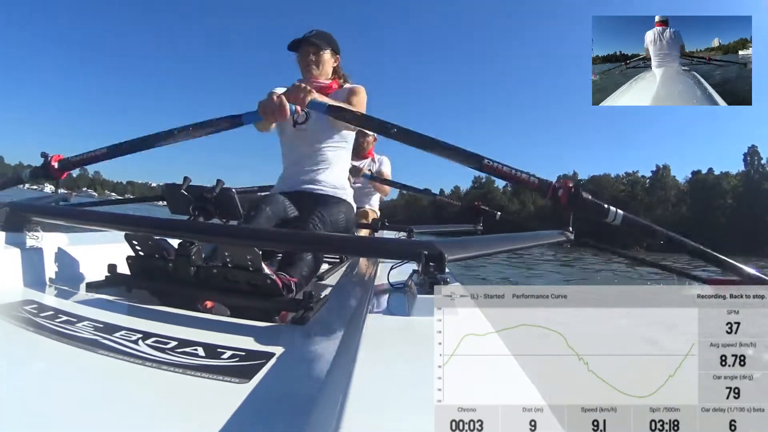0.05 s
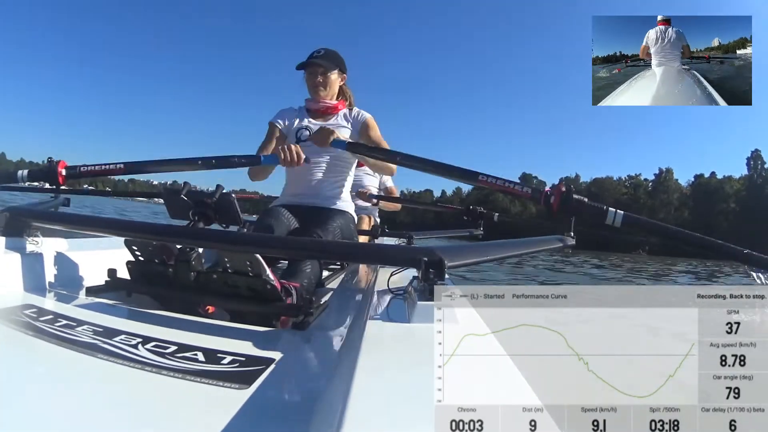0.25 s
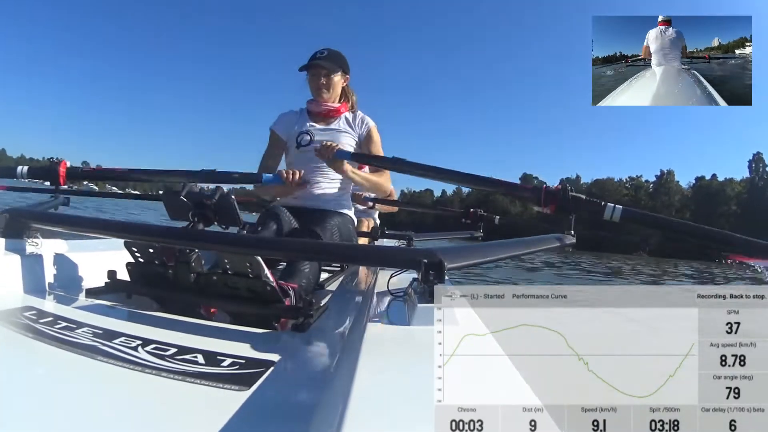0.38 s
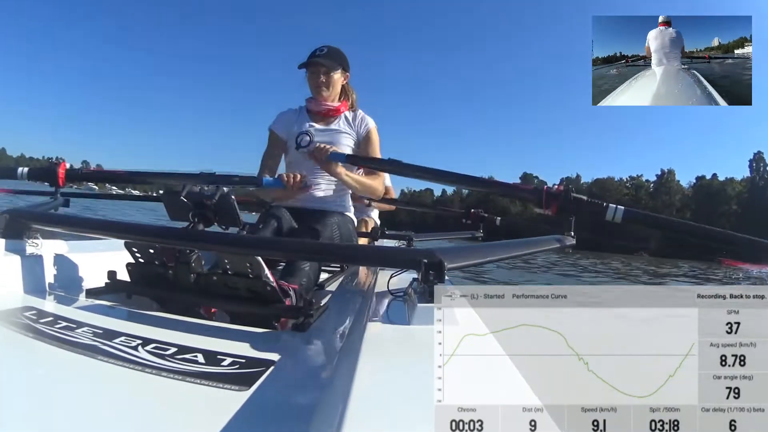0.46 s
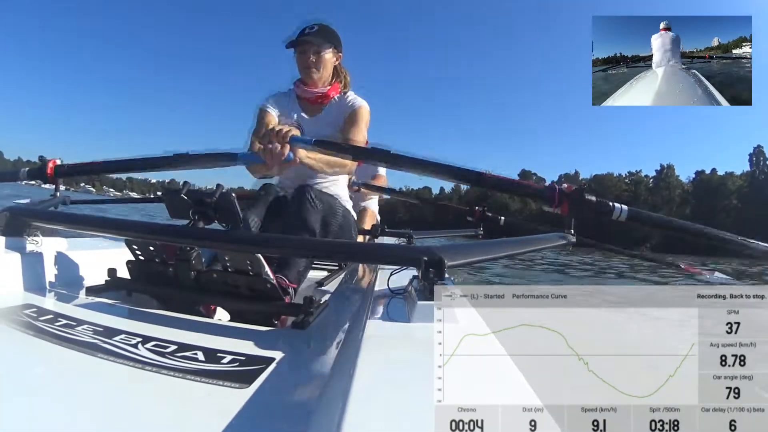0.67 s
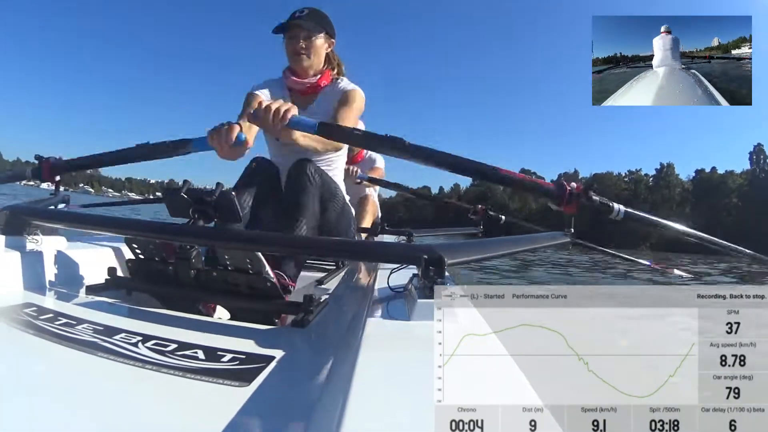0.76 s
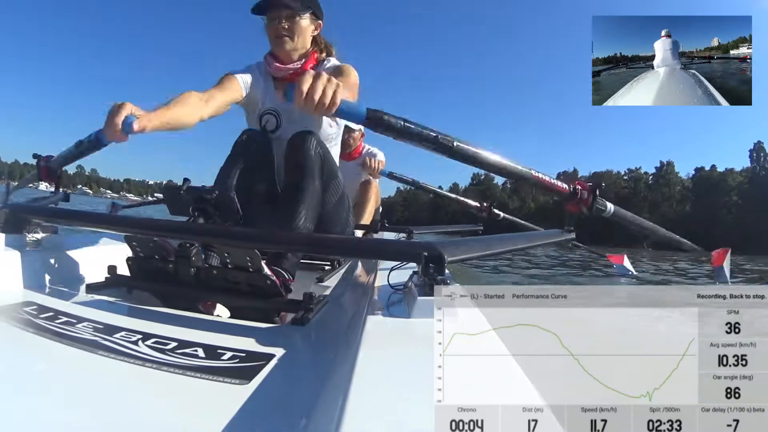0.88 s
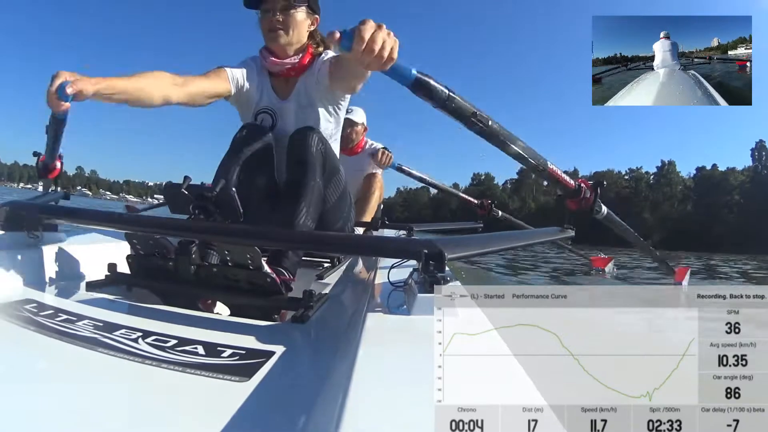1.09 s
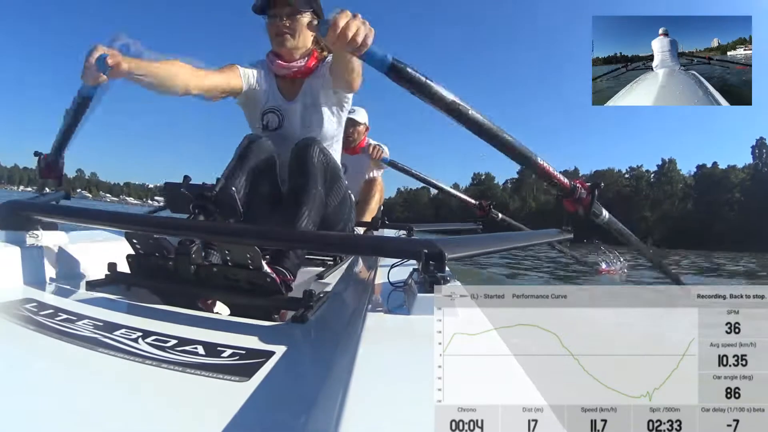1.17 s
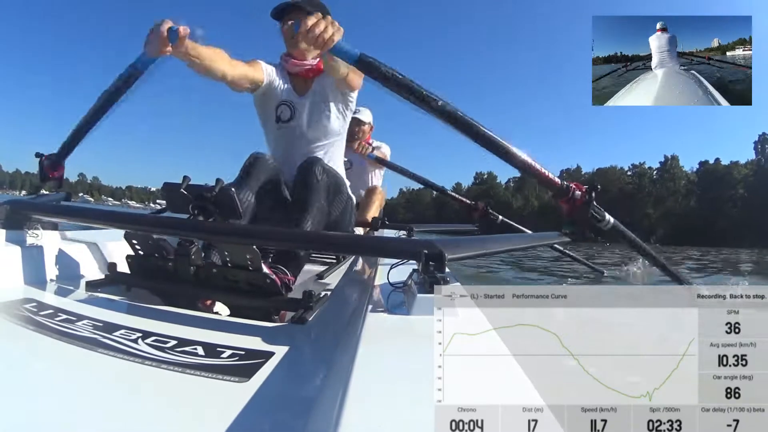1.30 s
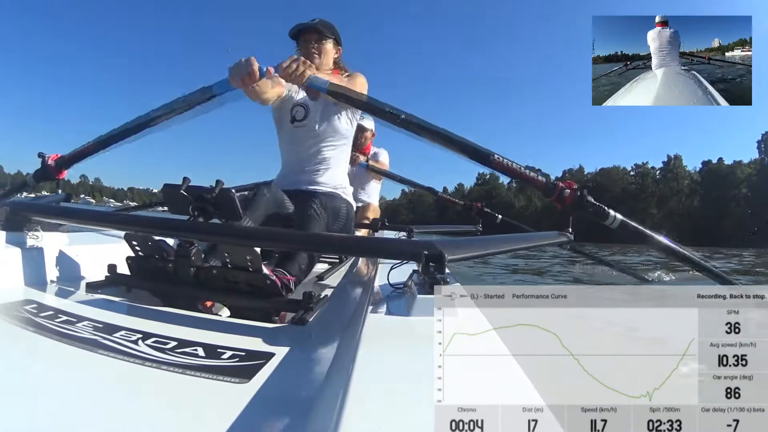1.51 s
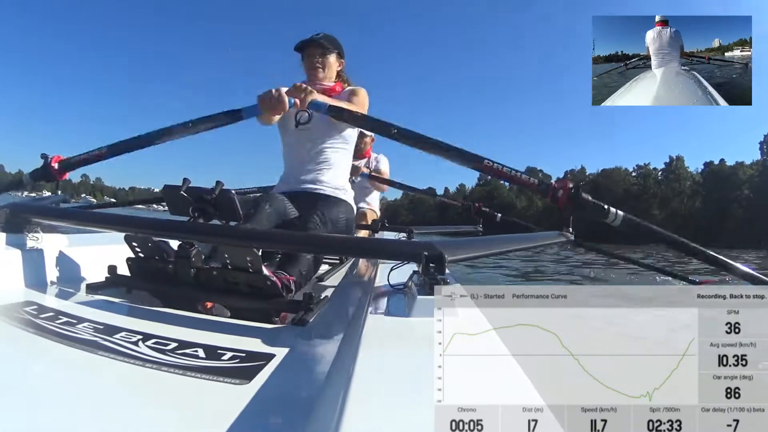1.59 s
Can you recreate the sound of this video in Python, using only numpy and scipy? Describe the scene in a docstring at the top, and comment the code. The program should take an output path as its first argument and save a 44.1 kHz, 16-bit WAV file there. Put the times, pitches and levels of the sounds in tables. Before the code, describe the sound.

Oars clunk in their locks as seats rumble and water washes past a rowing boat.

```python
"""One stroke of a double scull on open water, heard from the deck.
Throughout, water washes, spatters and bubbles alongside. From 0.2 s the oars clunk in their locks
and leave the water; sliding seats roll and boom the hollow hull; air buffets the microphone.
Near 0.5 s and 1 s fittings tick and the sleeves squeak as the oars turn.
At 1.2 s the oars clunk again, squared and dropped in; the rumble dies away."""
import sys
import numpy as np
from scipy import signal
from scipy.fft import rfft, irfft
from scipy.io import wavfile
from scipy.ndimage import uniform_filter1d, minimum_filter1d

SR = 44100
rng = np.random.default_rng(int(sys.argv[2]) if len(sys.argv) > 2 else 0)


def transcribe(signal):
    """Save signal, clipped to [-1, 1], as a 16-bit WAV file at the path in sys.argv[1]."""
    frames = np.atleast_2d(signal).T
    limited = np.clip(frames, -1, 1)
    pcm = np.round(limited * 32767).astype(np.int16)
    wavfile.write(sys.argv[1], SR, pcm)


N = 72765
T = np.arange(N) / SR

# Envelopes of hull wash, blade spray, rolling seats, air gusts: t/s, level/dB
WASH_ENV = [(0, -40.5), (.13, -36.5), (.18, -41.5), (.235, -32), (.27, -29.5), (.35, -37.5), (.46, -28.5),
            (.54, -23.5), (.6, -34), (.69, -44.5), (.76, -34), (.81, -31), (.87, -31.5), (.96, -28.5),
            (1.03, -29), (1.11, -42.5), (1.19, -32), (1.26, -28), (1.3, -40), (1.36, -42.5), (1.42, -35),
            (1.55, -42), (1.65, -36.5)]
SPRAY_ENV = [(0, -63), (.15, -56), (.28, -49), (.34, -57), (.44, -49), (.57, -51.5), (.63, -50),
             (.72, -51.5), (.85, -54.5), (1, -50), (1.05, -58.5), (1.28, -57), (1.47, -59.5), (1.65, -54.5)]
SEAT_ENV = [(0, -38.5), (.1, -31), (.195, -36), (.23, -12.5), (.3, -22), (.36, -16), (.405, -22),
            (.45, -13.5), (.6, -12), (.66, -22), (.72, -28.5), (.85, -28), (.94, -22.5), (.98, -13),
            (1.05, -10.5), (1.15, -26.5), (1.21, -27.5), (1.31, -31.5), (1.38, -27), (1.5, -35),
            (1.65, -34)]
GUST_ENV = [(0, -69.5), (.19, -63), (.26, -33), (.38, -52.5), (.44, -37), (.5, -63), (.555, -22),
            (.7, -26.5), (.86, -31), (1.0, -36.5), (1.2, -28), (1.3, -42), (1.65, -54)]
# Noise spectra of wash, spray, hull boom, wheel growl, air: f/Hz, level/dB
WASH_SPECTRUM = [(150, -15.5), (400, -1), (560, -2.5), (690, 10), (790, -4), (1000, 2), (1220, 5.5),
                 (1600, -4.5), (2300, -9.5), (3000, -30), (5000, -33), (9000, -44)]
SPRAY_SPECTRUM = [(400, -55.5), (1500, -4.5), (2800, 15.5), (3600, 11.5), (4700, 15), (5800, 3),
                  (7000, -12), (9000, -15), (11000, -15)]
BOOM_SPECTRUM = [(30, -74), (90, -26), (130, -6), (155, -1), (180, 2), (215, -9.5), (270, -17.5),
                 (340, -60.5), (3000, -120)]
GROWL_SPECTRUM = [(25, -28.5), (75, -12.5), (105, -18.5), (140, -23), (200, 3.5), (270, 1), (345, -15),
                  (400, -8), (470, -16.5), (600, -16), (900, -51), (6000, -100)]
AIR_SPECTRUM = [(15, -54.5), (35, -7), (60, 9), (100, 13.5), (200, 7.5), (600, -58), (4000, -92)]
# Burst spectra of sharp impacts, rigger shiver, sleeve clatter: f/Hz, level/dB
IMPACT_SPECTRUM = [(500, -22), (1500, -5), (3600, -1), (4700, 4), (6000, -3), (7500, -20), (11000, -25)]
SHIVER_SPECTRUM = [(2000, -49), (4400, -12.5), (5100, 5.5), (6500, -35.5)]
CLATTER_SPECTRUM = [(100, -16.5), (400, 1), (800, 13.5), (1200, 19.5), (2200, 7), (3000, -6), (4700, -11),
                    (6500, -47), (11000, -52)]
# Left-right correlation of wash, spray, wheel growl: f/Hz, correlation
WASH_CORR = [(200, 0.91), (400, 0.33), (650, 1), (850, 0.34), (1200, 0.91), (2000, 0.39), (6000, 0.2)]
SPRAY_CORR = [(1000, 0.069), (5000, 0.61), (8000, 0.14)]
GROWL_CORR = [(30, 1), (180, 0.93), (270, 1), (380, 0.33), (2000, 0.47)]
# Modes of collar, lock with rigger, hollow hull: f/Hz, level/dB, t60/s
COLLAR_MODES = [(2310, 17, 0.0053), (3790, -9, 0.035), (4510, 6.5, 0.0079)]
LOCK_MODES = [(498.5, 4, 0.062), (674, -3.5, 0.19), (960, 5, 0.012), (1280, -0.5, 0.02), (1393, -16, 0.15),
              (1730, 6.5, 0.017), (2234, 1, 0.029), (4260, -17.5, 0.021)]
HULL_MODES = [(157.25, -15, 0.67), (154, -0.5, 0.063), (214, -8, 0.049), (294, -2.5, 0.041),
              (280, 1, 0.025)]
# Bubbles beside the hull, drips off the blades: t/s, f/Hz, level/dB
BUBBLES = [(.05, 710, -27.5), (0.261, 1220, -22), (.8, 1120, -26.5), (1.054, 1036, -18), (1.32, 1100, -26),
           (1.399, 1052, -26.5), (1.41, 551, -30), (1.61, 594, -31.5)]
DRIPS = [(0.0626, 4600, -45), (0.0954, 3380, -42), (.174, 4800, -40), (0.2474, 4560, -38),
         (.392, 4610, -41), (1.1742, 4050, -40), (1.533, 4370, -38), (1.608, 5900, -46.5)]
# Collar slams: t/s, clack/dB, f/Hz, pan/dB, metal/dB, thud/dB
SLAMS = [(0.1971, -17.5, 2055, 5.5, -32, -34), (0.32, -23.5, 1230, -3.5, -48, -21),
         (0.4823, -11, 1400, 2, -41.5, -29), (0.486, -19, 1250, -2, -28, -27.5),
         (0.522, -2.5, 1192, -3.5, -27.5, -14), (0.663, -22, 1170, -2, -50.5, -32.5),
         (0.986, -19, 1600, 3, -45.5, -28.5), (1.2284, -2.5, 1100, 3, -21.5, -2),
         (1.2317, -6, 1000, 11, -19.5, -22.5)]
# Oar knocks in the locks: t/s, level/dB, treble/dB, thump/dB, scrape decay/s, pan/dB
KNOCKS = [(0.1975, -17.5, -6.5, -34, 0.011, -1), (.213, -18, -10, -15.5, 0.0096, 1),
          (.320, -20, -4.5, -12.5, 0.0041, 4.5), (0.413, -17, -17, -20.5, 0.01, 0),
          (.446, -23, 5.5, -16, 0.032, -2), (.4835, -13.5, 0, -14, 0.011, -3),
          (.5165, -6, -2.5, -7, 0.0063, 3), (.637, -25, 1, -13, 0.025, -1.5),
          (.894, -20, -0.5, -15.5, 0.0044, 2.5), (.9845, -13, -13, -18, 0.004, -1.5),
          (1.055, -26, -1.5, -29.5, 0.024, -1), (1.2305, -5.5, -9.5, -11, 0.0071, 4.5),
          (1.318, -31, 2, -31, 0.027, 0.5)]
# Hull booms, sleeve squeaks: t/s, length/s, start f/Hz, end f/Hz, level/dB
BOOMS = [(.215, 0.038, 200, 160, -10), (.322, .072, 176.1, 166, -6.5), (.428, 0.056, 180, 211.8, -4.5),
         (.485, 0.044, 175, 175.7, -13.5), (.555, 0.055, 165, 158, -6.5), (.643, 0.033, 205, 166.7, -11.5),
         (0.764, 0.016, 235, 191.5, -12.5), (.998, 0.072, 188.8, 179.3, -5),
         (1.082, 0.074, 185, 156.8, -14.5)]
SQUEAKS = [(0.507, 0.037, 1847, 1978, -22.5), (0.541, 0.039, 2180, 2260, -33.5),
           (0.979, 0.033, 1650, 1610, -24.5), (1.005, 0.025, 1713, 1924, -30)]
# Ticks of the fittings: t/s, level/dB, pan/dB
TICKS = [(.442, -28.5, -8), (0.452, -22.5, -7), (0.492, -25, -4), (0.4966, -29.5, 1), (0.51, -30, -6.5),
         (0.599, -39.5, 12), (1.008, -34, 8)]
# Phase between the microphone ports: f/Hz, left lead/rad
PORT_PHASE = [(50, 0), (100, .3), (180, .65), (280, .6), (370, 1.2), (470, .4), (640, -1.5), (850, -2.2),
              (1050, -.35), (1600, -.1), (5000, 0)]
# Balance of the ports: f/Hz, left over right/dB
PORT_BALANCE = [(380, -.5), (480, 1.5), (850, 2), (1200, -1), (1700, -.5), (2300, 3), (3200, -1),
                (5000, -1.5), (9000, 1.5)]


def amp(db):
    """dB to gain."""
    return 10 ** (np.asarray(db) / 20)


def unit(x):
    """Scale to rms 1."""
    return x / np.sqrt(np.mean(x ** 2) + 1e-20)


def at_hz(points, hz):
    """Interpolate over log frequency."""
    f, value = np.transpose(points)
    return np.interp(np.log(hz + 1), np.log(f), value)


def envelope(points):
    """Gain over time from dB breakpoints."""
    return amp(np.interp(T, *np.transpose(points)))


def pan(db):
    """Stereo gains, left over right by db."""
    return amp([[db / 2], [-db / 2]])


def add(mix, t_s, sound):
    """Mix a sound in at t_s."""
    part = mix[:, round(t_s * SR):][:, :sound.shape[-1]]
    part += sound[..., :part.shape[1]]


def noise(spectrum, corr, size=N):
    """Stereo noise, rms 1, of given spectrum and left-right correlation."""
    hz = np.fft.rfftfreq(size, 1 / SR)
    a, b = rfft(rng.standard_normal((2, size)))
    c = np.clip(at_hz(corr, hz) if np.ndim(corr) else corr, -1, 1)
    mid, side = a * np.sqrt(1 + c), b * np.sqrt(1 - c)
    return unit(irfft(np.array([mid + side, mid - side]) * amp(at_hz(spectrum, hz)), size))


def decay(t, tau_s):
    """Exponential fall from 1."""
    return np.exp(-t / tau_s)


def attack(t, tau_s):
    """Exponential rise to 1."""
    return 1 - decay(t, tau_s)


def ring(modes, t, detune):
    """Decaying modes, randomly detuned per blow."""
    return sum(amp(db - 60 * t / t60_s) * np.sin(2 * np.pi * hz * (1 + detune * rng.uniform(-1, 1)) * t)
               for hz, db, t60_s in modes)


def ping(t, hz, rise_s):
    """A few cycles that swell for rise_s, then die."""
    return t / rise_s * np.exp(1 - t / rise_s) * np.sin(2 * np.pi * hz * t)


def wobble(size, smooth_samples):
    """Smooth random motion, rms about 1."""
    rough = uniform_filter1d(rng.standard_normal(16384), smooth_samples)
    return unit(uniform_filter1d(rough, smooth_samples // 2))[:size]


def wash(flutter_db=2.18):
    """Water washes along the hull, level fluttering."""
    flutter = amp(flutter_db * unit(uniform_filter1d(rng.standard_normal(N), size=450)))
    return unit(noise(WASH_SPECTRUM, WASH_CORR) * flutter) * envelope(WASH_ENV)


def spray(drops_per_s=700, spread_db=3.2, drops_db=-5, shapes=10):
    """Spray off the blades: hiss plus separate drop impacts."""
    drops, t = np.zeros((2, N)), np.arange(256) / SR
    for _ in range(shapes):
        hits = rng.random(N) < drops_per_s / shapes / SR
        gains = amp(spread_db * np.minimum(rng.exponential(1, N), 4))
        splat = noise(SPRAY_SPECTRUM, SPRAY_CORR, len(t)) * attack(t, 0.0004) * decay(t, 0.00071)
        drops += signal.oaconvolve((hits * gains)[None], splat)[:, :N]
    hiss = noise(SPRAY_SPECTRUM, SPRAY_CORR)
    return unit(hiss + amp(drops_db) * unit(drops)) * envelope(SPRAY_ENV) * pan(db=-2.5)


def seats(window_s=0.05, growl_db=-3):
    """Seat wheels growl on their rails and keep the hull booming with even pressure."""
    boom = noise(BOOM_SPECTRUM, corr=1)
    power = (abs(signal.hilbert(boom)) ** 2).mean(0)
    smooth_power = signal.fftconvolve(power, np.hanning(round(window_s * SR)), "same")
    even_boom = unit(boom / np.sqrt(abs(smooth_power)))
    growl = amp(growl_db) * noise(GROWL_SPECTRUM, GROWL_CORR)
    return (even_boom + growl) * envelope(SEAT_ENV) * pan(db=-0.19)


def air(floor_db=-49):
    """Gusts buffet the microphone, left of centre, over a faint steady rumble."""
    gusts = noise(AIR_SPECTRUM, corr=1) * envelope(GUST_ENV) * pan(db=2.5)
    return gusts + amp(floor_db) * noise(AIR_SPECTRUM, corr=0.98)


def bubble(hz, decay_cycles=12, rise_per_s=1.55):
    """A bursting bubble: soft ping, rising as it dies."""
    t = np.arange(3072) / SR
    tone = np.sin(2 * np.pi * hz * t * (1 + rise_per_s * t / 2))
    return attack(t, 0.0012) * decay(t, decay_cycles / hz) * tone


def bubbles(small_per_s=53, low_hz=880, high_hz=1796, small_db=-96.5):
    """A few clear bubbles; small ones follow the wash, too faint to hear."""
    clear, small = np.zeros((2, 2, N))
    for t_s, hz, db in BUBBLES:
        add(clear, t_s, amp(db) * bubble(hz))
    for when, pitch, size, side in rng.random((round(small_per_s * N / SR), 4)):
        hz = low_hz * (high_hz / low_hz) ** pitch
        gain = amp(small_db + 10 * size - 5 * pitch) * pan(8 * (side - 0.5))
        add(small, when * N / SR, gain * bubble(hz))
    return clear + small * envelope(WASH_ENV)


def drip(hz, swell_s=0.0012, rise_per_s=10, splash_db=-0.5):
    """A drop lands: soft splash, tiny rising plink."""
    t = np.arange(512) / SR
    splash = noise(IMPACT_SPECTRUM, corr=0.28, size=len(t)) * t / swell_s * decay(t, swell_s)
    plink = ping(t, hz * (1 + rise_per_s * t / 2), swell_s)
    return amp(splash_db) * splash + 0.5 * plink


def drips(small_per_s=70, low_hz=2800, high_hz=5200, small_db=1):
    """A few clear drops fall from the blades; droplets follow the spray."""
    clear, small = np.zeros((2, 2, N))
    for t_s, hz, db in DRIPS:
        add(clear, t_s, amp(db) * pan(db=-3) * drip(hz))
    for when, pitch, size, side in rng.random((round(small_per_s * N / SR), 4)):
        hz = low_hz * (high_hz / low_hz) ** pitch
        gain = amp(small_db + 10 * (size - 0.5)) * pan(10 * (side - 0.5))
        add(small, when * N / SR, gain * drip(hz))
    return clear + small * envelope(SPRAY_ENV)


def collars(crack_db=-15.5, shiver_db=-24.5):
    """Collars slam home: hard clack, metallic crack with rigger shiver, then a dull thud."""
    out, t = np.zeros((2, N)), np.arange(8192) / SR
    for t_s, clack_db, hz, pan_db, metal_db, thud_db in SLAMS:
        add(out, t_s, amp(clack_db) * pan(pan_db) * ping(t, hz, rise_s=0.00092))
        crack = amp(crack_db) * noise(IMPACT_SPECTRUM, corr=0.32, size=len(t)) * decay(t, 0.0025)
        shiver = amp(shiver_db) * noise(SHIVER_SPECTRUM, corr=0.92, size=len(t)) * decay(t, 0.022)
        metal = ring(COLLAR_MODES, t, detune=0.046) + crack + shiver
        add(out, t_s + 0.0006, amp(metal_db) * metal * attack(t, 0.00042))
        add(out, t_s + 0.003, amp(thud_db) * ping(t, hz=216, rise_s=0.0019))
    return out


def oarlocks(ring_db=-7, clatter_db=-3.5, tail_db=-32, shelf_hz=2580, corr=0.68):
    """Each knock is a short scrape: the lock rings, the sleeve clatters, the hull thumps."""
    out, t = np.zeros((2, N)), np.arange(5120) / SR
    for t_s, db, treble_db, thump_db, scrape_s, pan_db in KNOCKS:
        scrape = attack(t, 0.00033) * decay(t, scrape_s)
        push = scrape + amp(tail_db) * decay(t, 0.027)
        contact = noise([(100, 0), (9000, 0)], corr, len(t)) * scrape  # white
        lock = signal.fftconvolve(contact, ring(LOCK_MODES, t, detune=0.023)[None])[:, :len(t)]
        clatter = noise(CLATTER_SPECTRUM, corr, len(t)) * push
        knock = amp(ring_db) * unit(lock) + amp(clatter_db) * unit(clatter)
        knock *= np.sqrt(np.mean(push ** 2))
        low = signal.lfilter(*signal.butter(1, shelf_hz, fs=SR), knock)
        add(out, t_s, amp(db) * pan(pan_db) * (low + amp(treble_db) * (knock - low)))
        thump = ring(HULL_MODES, t, detune=0.061) * attack(t, 0.004)
        add(out, t_s + 0.0029, amp(thump_db + 2.5) * thump / abs(thump).max())
    return out


def hull_booms(wander=0.03):
    """Passing seats ring the hull briefly on one gliding, wavering note."""
    out = np.zeros((2, N))
    for t_s, length_s, start_hz, end_hz, db in BOOMS:
        u = np.arange(0, 1, 1 / (length_s * SR))
        hz = (start_hz + (end_hz - start_hz) * u) * (1 + wander * wobble(len(u), 300))
        swell = np.sin(np.pi * u) ** 0.3
        add(out, t_s, amp(db) * swell * np.sin(2 * np.pi * (np.cumsum(hz) / SR + rng.random())))
    return out * pan(db=-1.3)


def fittings(decay_s=0.002):
    """Fittings tick: short, bright noise bursts."""
    out, t = np.zeros((2, N)), np.arange(1024) / SR
    for t_s, db, pan_db in TICKS:
        tick = noise(IMPACT_SPECTRUM, corr=0.28, size=len(t)) * decay(t, decay_s)
        add(out, t_s, amp(db) * pan(pan_db) * tick)
    return out


def sleeves(roughness=0.04, chatter=0.7):
    """Sleeves squeak and chatter as the oars turn, mostly gliding up."""
    out = np.zeros((2, N))
    for t_s, length_s, start_hz, end_hz, db in SQUEAKS:
        u = np.arange(0, 1, 1 / (length_s * SR))
        hz = (start_hz + (end_hz - start_hz) * u) * (1 + roughness * wobble(len(u), 40))
        grip = np.sqrt(np.sin(np.pi * u)) * (1 + chatter * wobble(len(u), 70))
        add(out, t_s, amp(db) * grip * np.sin(2 * np.pi * np.cumsum(hz) / SR))
    return out


def scene():
    """Water, boat and air, summed in stereo."""
    bed = wash() + spray() + seats() + air()
    return bed + bubbles() + drips() + collars() + oarlocks() + hull_booms() + fittings() + sleeves()


def record(dry):
    """Two microphone ports colour the sides; then a fast limiter and a low-pass."""
    ceiling_db, release_db_per_s, cutoff_hz = -4, 180, 11200
    hz = np.fft.rfftfreq(2 * N, 1 / SR)
    port = np.exp(0.5j * at_hz(PORT_PHASE, hz)) * amp(at_hz(PORT_BALANCE, hz) / 2)
    heard = irfft(rfft(dry, 2 * N) * np.array([port, 1 / port]))[:, :N]
    release_db = T * release_db_per_s
    over_db = np.maximum(20 * np.log10(abs(heard).max(0) + 1e-9) - ceiling_db, 0)
    gain_db = minimum_filter1d(release_db - np.maximum.accumulate(over_db + release_db), size=120)
    limited = heard * amp(uniform_filter1d(gain_db, size=120))
    lowpass = signal.firwin(255, cutoff_hz, window=("kaiser", 7), fs=SR)
    return signal.oaconvolve(limited, lowpass[None], "same")


dry = scene()
out = record(dry)
transcribe(out)
```